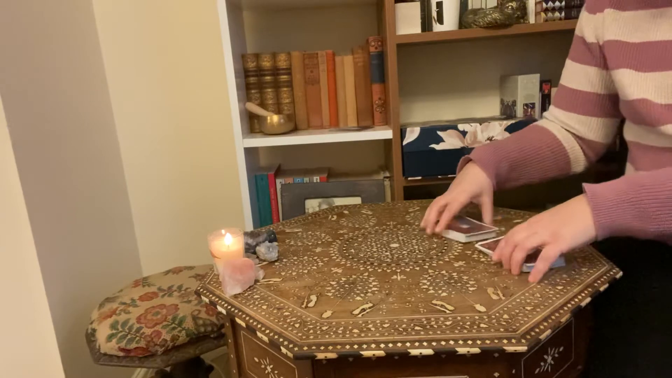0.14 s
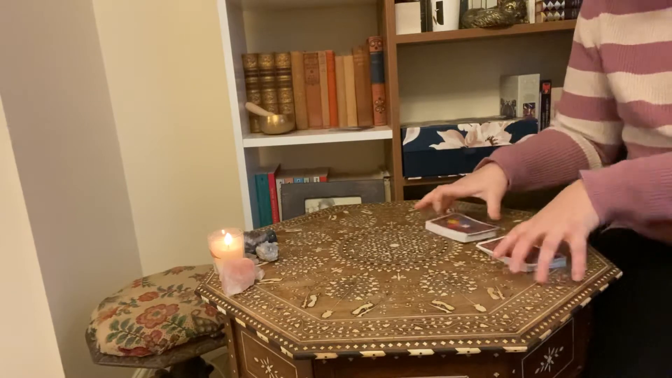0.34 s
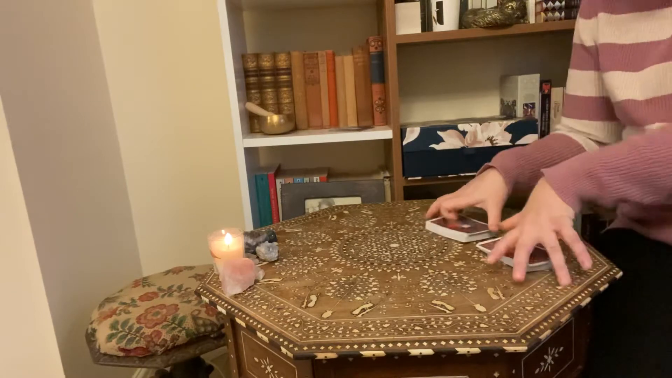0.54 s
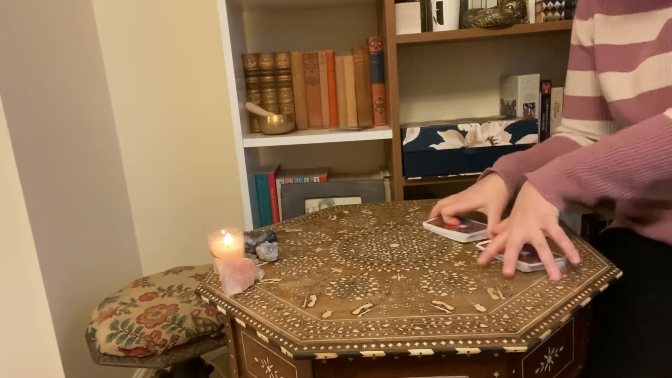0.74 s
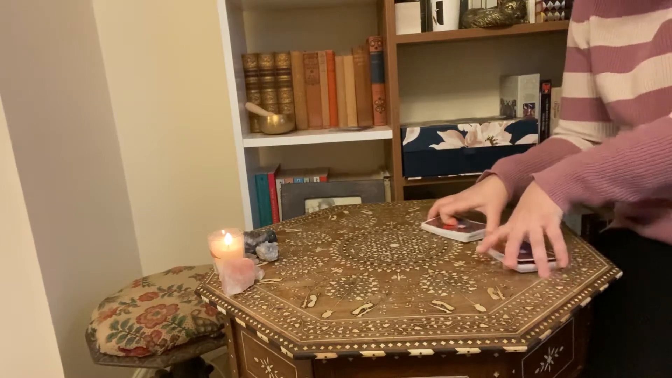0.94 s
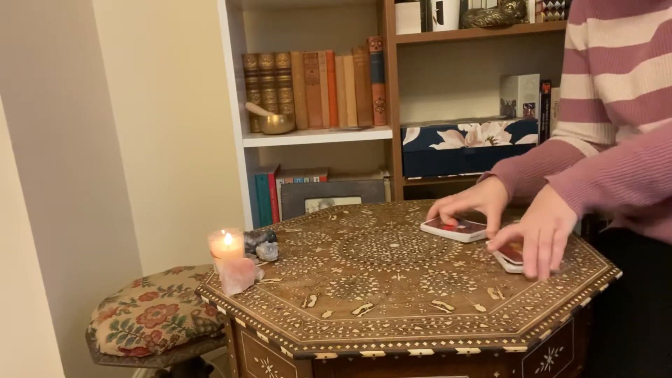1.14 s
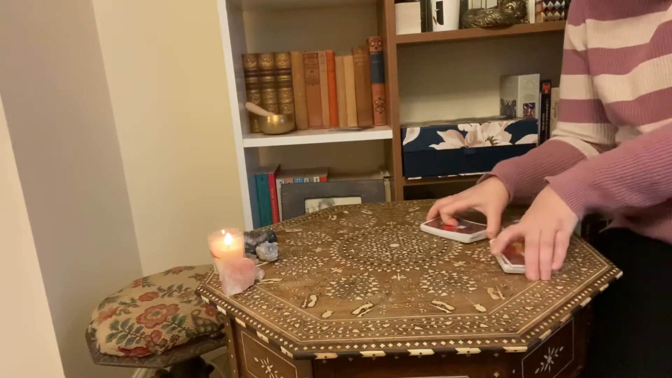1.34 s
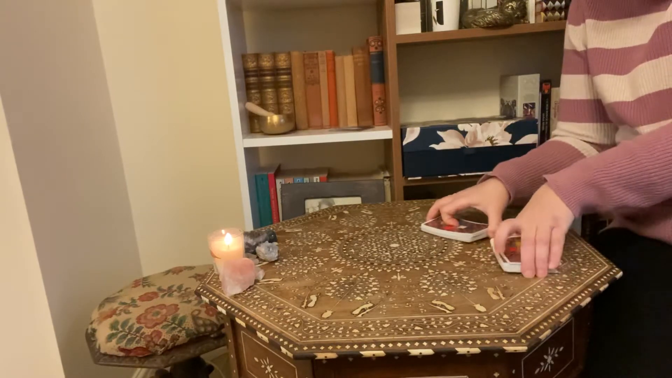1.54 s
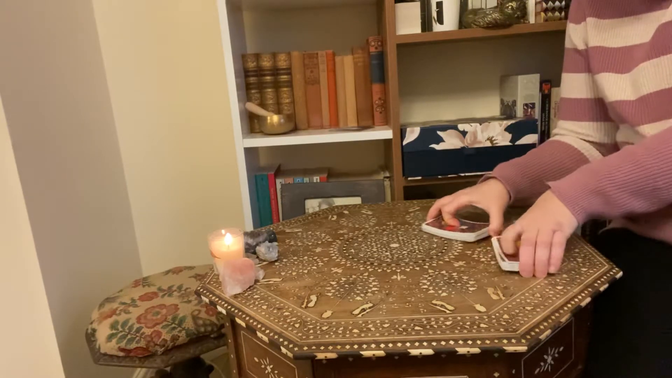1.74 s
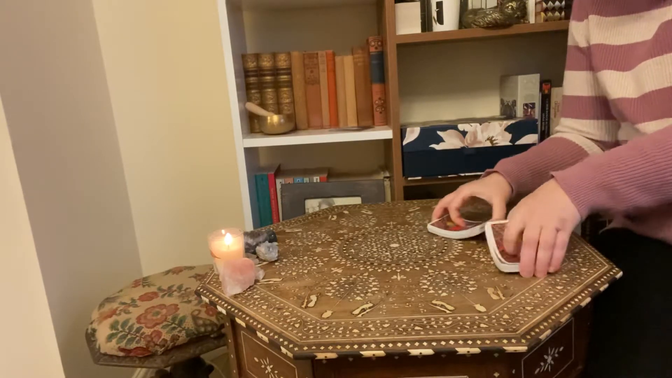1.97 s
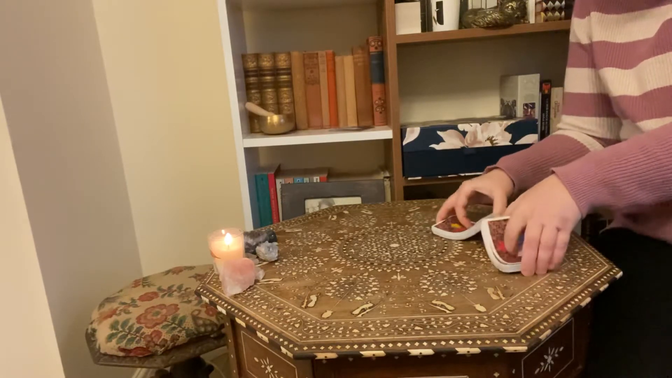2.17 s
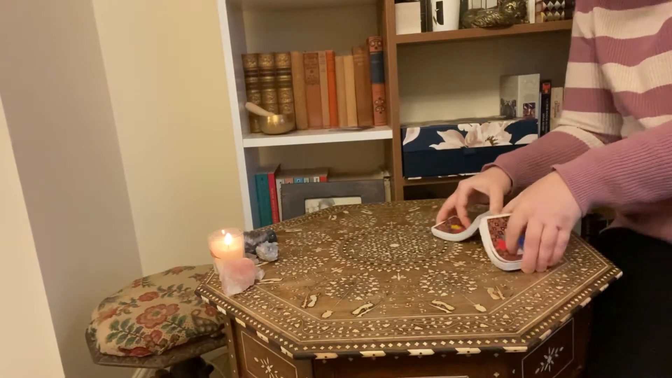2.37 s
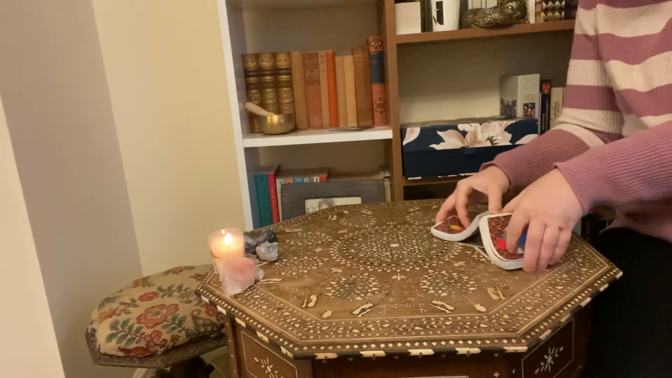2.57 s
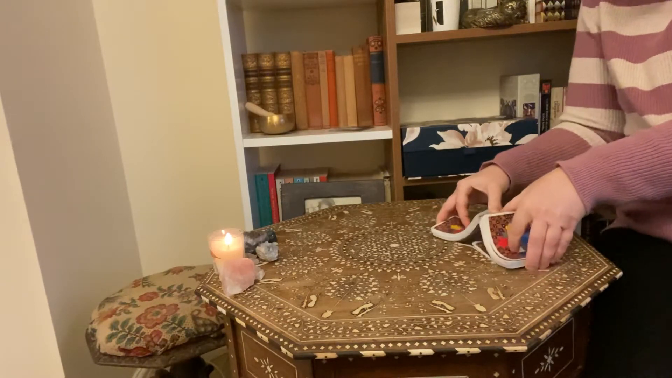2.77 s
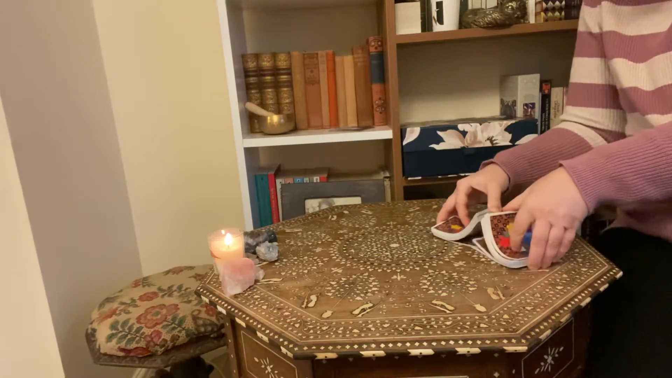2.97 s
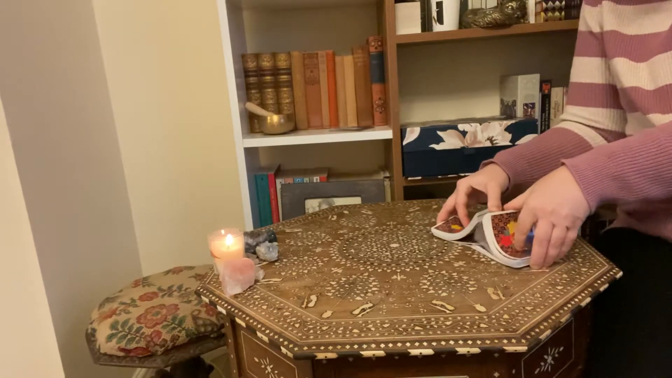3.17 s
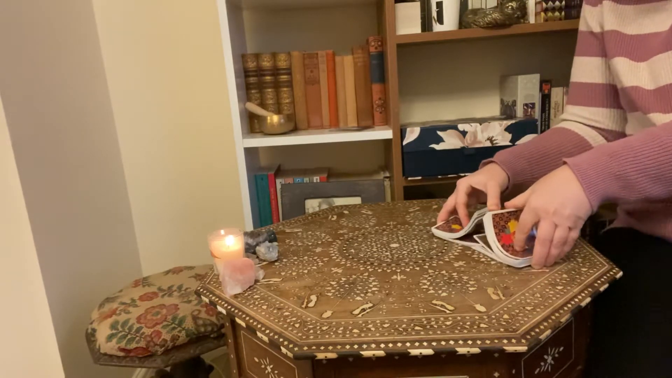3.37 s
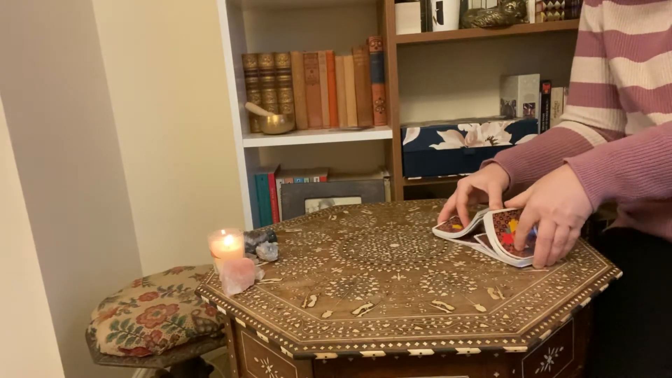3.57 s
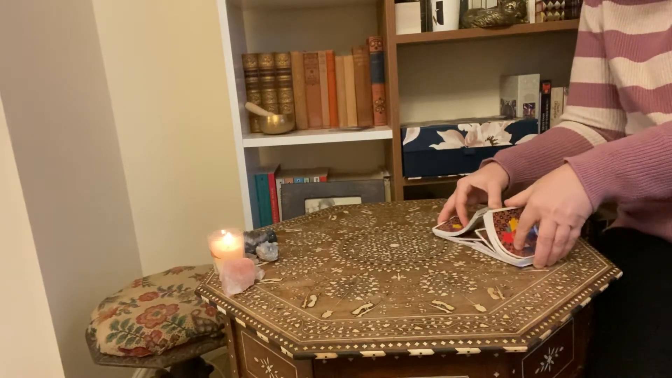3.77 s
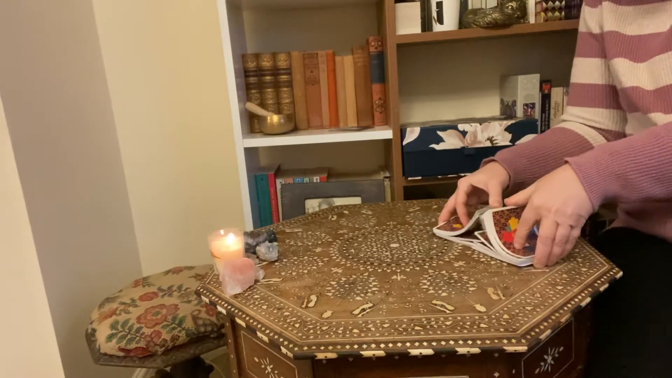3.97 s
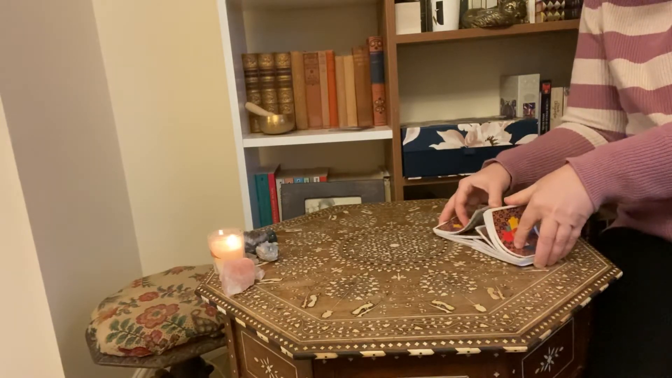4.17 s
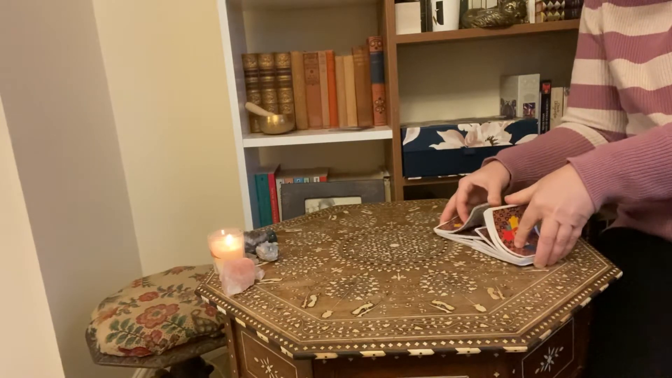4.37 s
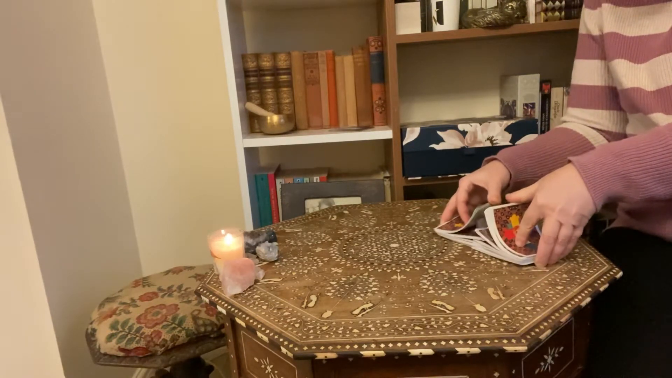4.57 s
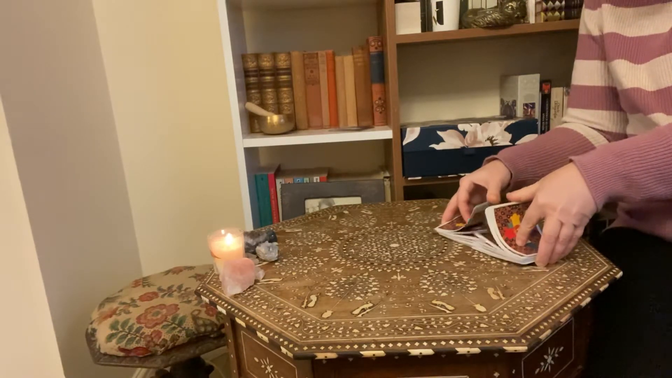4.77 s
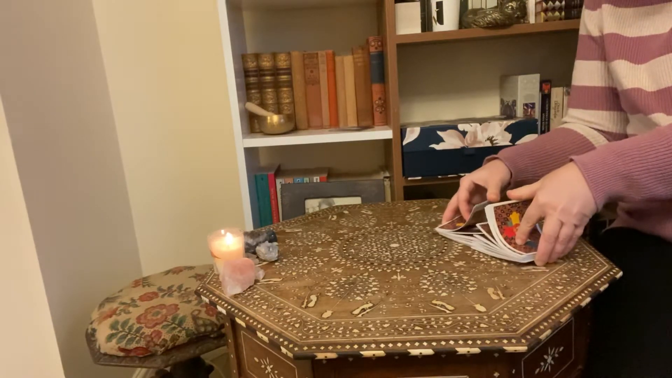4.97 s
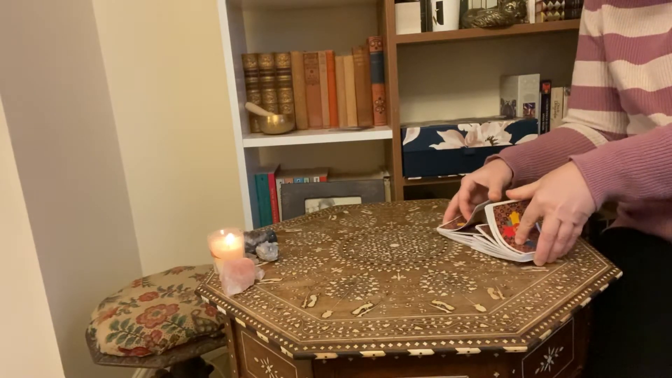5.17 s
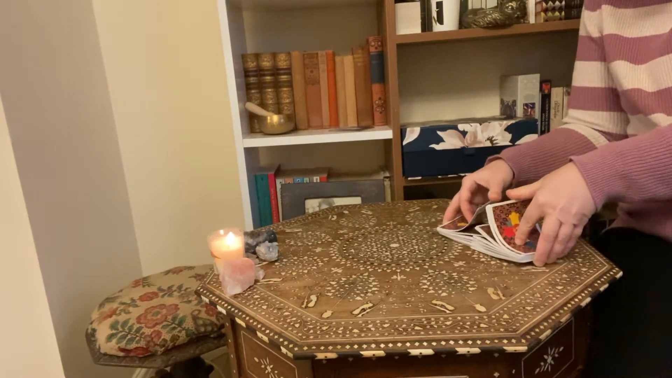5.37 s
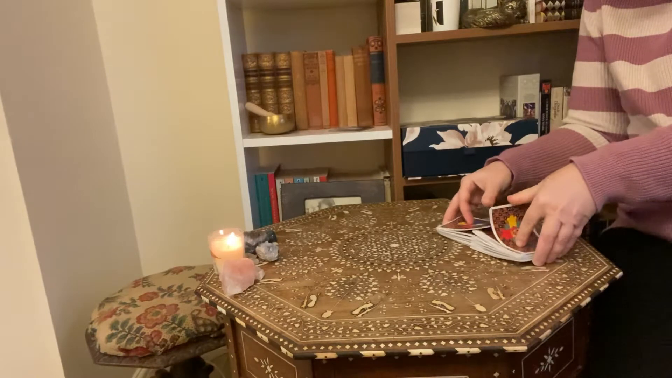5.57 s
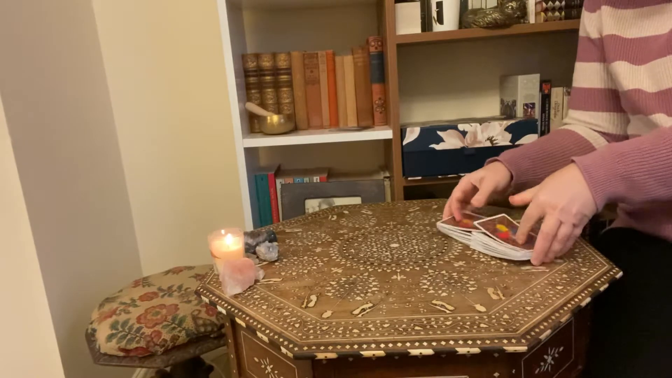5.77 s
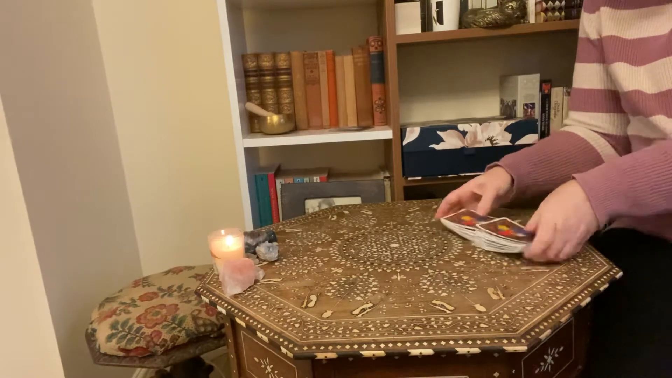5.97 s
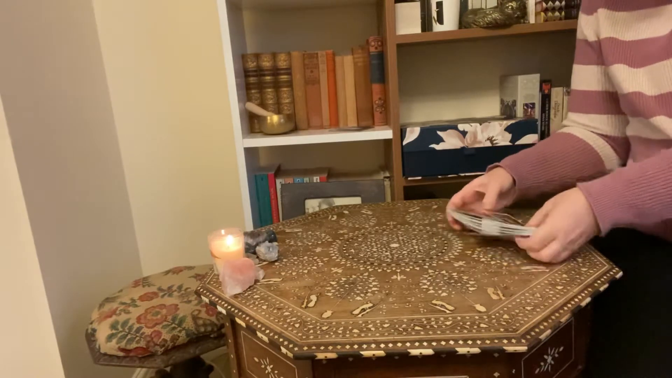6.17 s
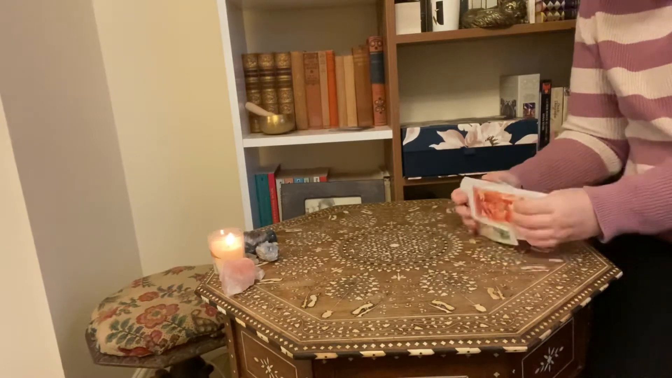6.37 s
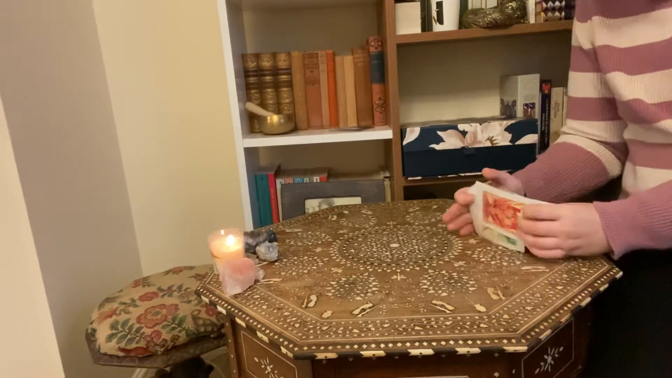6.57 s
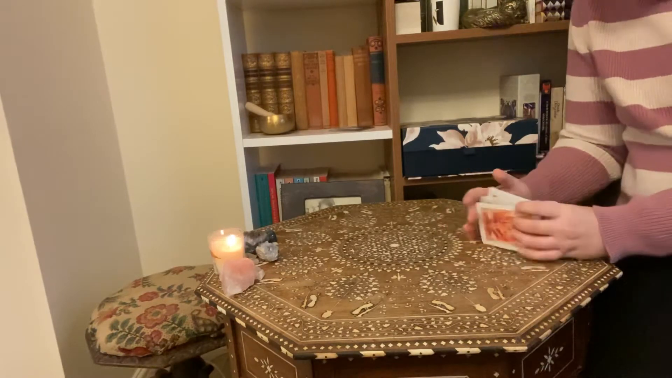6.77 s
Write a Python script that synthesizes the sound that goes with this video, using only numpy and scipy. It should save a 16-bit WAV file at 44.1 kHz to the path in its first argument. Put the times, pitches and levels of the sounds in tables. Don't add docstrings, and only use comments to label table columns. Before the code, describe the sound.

Close stereo pickup in a small room with a faint low hum. A soft thump sets the card packets on a hollow wooden table, then about two quiet seconds with barely audible touches. Cards riffle slowly and irregularly, snapping singly and in tight flurries, with one hard crack. The snaps thin out, then the deck slides with a light hiss and is squared with dull taps.

```python
import sys
import numpy as np
from scipy import signal
from scipy.fft import rfft, irfft
from scipy.io import wavfile

SR = 44100
rng = np.random.default_rng(int(sys.argv[2]) if len(sys.argv) > 2 else 0)


def persist_wave(psi):
    counts = np.round(np.clip(psi, -1, 1) * 32767).astype(np.int16)
    wavfile.write(sys.argv[1], SR, np.atleast_2d(counts).T)


def convert_level_to_amplitude(level_db):
    exponent = np.asarray(level_db, float) / 20
    return 10 ** exponent


N = 300762
TIME = np.arange(N) / SR


def rms_one(x):
    return x / np.sqrt(np.mean(x ** 2) + 1e-20)


def at_hz(points, hz):
    f, value = np.transpose(points)
    return np.interp(np.log(hz), np.log(f), value)


def drift(rate):
    step = 40
    r = np.exp(-2 * step * np.pi * rate / SR)
    slow = signal.lfilter([1], [1, -2 * r, r * r], rng.standard_normal(N // step + 2002))[2000:]
    return np.interp(np.arange(N) / step, np.arange(len(slow)), rms_one(slow))


def swell(middle, half, db):
    return convert_level_to_amplitude(db - 12 * np.minimum(((TIME - middle) / half) ** 2, 20))


def resonate(x, hz, width_hz):
    r = np.exp(-np.pi * width_hz / SR)
    zeros = np.array([1, 0, -1]) * (1 - r * r) / 2
    return signal.lfilter(zeros, [1, -2 * r * np.cos(2 * np.pi * hz / SR), r * r], x)


def body(x, modes):
    return sum((-1) ** k * convert_level_to_amplitude(db) * resonate(x, hz, width) for k, (hz, width, db) in enumerate(modes))


def bands(size, likeness):
    edges = 60 * 2 ** np.arange(0, 8.6, .5)
    white = rng.standard_normal((2, 2, size))
    for k, (low, high) in enumerate(zip(edges, edges[1:])):
        centre = np.sqrt(low * high)
        band = signal.butter(2, [low, high], "band", fs=SR, output="sos")
        mid, side = signal.sosfilt(band, white[k % 2])
        alike = np.clip(at_hz(likeness, centre), -1, 1)
        yield centre, np.sqrt(1 + alike) * mid + np.sqrt(1 - alike) * side * [[1], [-1]]


# t/s, peak level/dB, card resonance f/Hz, edge level/dB re peak, knock level/dB
SINGLES = [(2.396, -26.5, 1930, -2, -60), (2.61, -23.5, 3630, -6, -44.5), (2.712, -17, 1730, -10.5, -35.5),
           (2.88, -34, 1670, -12, -46), (2.941, -23.5, 3240, -11.5, -46.5), (3.229, -6.5, 2354, -12.5, -44),
           (3.92, -27, 1980, -6, -45.5), (4.27, -29.5, 1860, -9.5, -45), (4.507, -31, 1800, -13.5, -45),
           (4.688, -29.5, 3090, -5, -42.5), (4.735, -19.5, 1920, -7.5, -37),
           (4.925, -27.5, 1910, -9.5, -40), (5.125, -26.5, 1810, -15.5, -38.5),
           (5.319, -28.5, 1760, -5, -52.5), (5.618, -15, 1846, -9.5, -42.5)]
FOLLOWERS = [(2.759, -19, 2940, -9, -39), (2.995, -15, 3170, -21, -62), (3.049, -17, 3280, -14, -48),
             (3.107, -14.5, 1920, -11, -45.5), (3.435, -20.5, 3320, -11.5, -47),
             (3.474, -17, 3260, -11.5, -46), (3.618, -18.5, 3380, -10, -57),
             (3.671, -14, 2950, -8.5, -39.5), (3.751, -27, 1870, -12, -52), (3.757, -24, 1920, -6.5, -43),
             (3.813, -26, 1840, -8.5, -49), (3.945, -43.5, 1820, -14, -42.5), (4.088, -21, 1800, -8, -42),
             (4.094, -18.5, 1770, -5, -42.5)]
CRACKS = [
    (2.411, -15, 2960, -1, -44.5),
    (2.498, -17.5, 2010, -6.5, -42),
    (3.073, -14, 1280, -8, -29.5),
    (5.336, -28, 1820, -1.5, -55.5),
    (5.367, -22, 2860, -6, -46.5),
]
# t/s, peak level/dB, card resonance f/Hz, edge level/dB re peak
TOUCHES = [(0.119, -55, 1840, -35), (0.571, -48.5, 1650, -14.5), (0.789, -63, 1690, -8),
           (0.959, -63.5, 3080, -10), (1.091, -59, 3300, -10), (1.684, -47, 1850, -15),
           (2.463, -24, 3000, -5.5), (2.662, -23.5, 1550, -12), (3.113, -29, 1820, -4),
           (3.24, -10.5, 2460, -35.5), (3.633, -15.5, 1910, -17.5), (3.65, -17.5, 1320, -15),
           (3.962, -16.5, 3140, -15.5), (4.038, -22.5, 1620, -10.5), (4.285, -26.5, 1835, -8.5),
           (4.528, -36.5, 1860, -10.5), (4.678, -41, 2630, -1), (4.741, -21, 2030, -23),
           (5.11, -39, 1990, -6.5), (5.601, -31.5, 1900, -12.5), (5.612, -16, 1113, -20),
           (6.174, -46, 1400, 2), (6.186, -44.5, 3100, 3.5), (6.218, -44.5, 3350, 6)]
SQUARING = [(6.417, -45, 2320, -23), (6.545, -25.5, 1700, -21.5), (6.552, -15.5, 3050, -48),
            (6.558, -14, 1980, -44), (6.566, -13, 1730, -16), (6.572, -18.5, 1080, -40),
            (6.579, -19, 1735, -29), (6.672, -11.5, 3150, -43), (6.674, -15.5, 970, -51),
            (6.735, -19, 1780, -24), (6.806, -30.5, 2800, -50)]
DRAGS = [
    (0.011, -33, 1740, -14.5),
    (5.967, -39, 2330, -10.5),
    (6.338, -44, 1000, -28.5),
    (6.438, -25, 1320, -27.5),
    (6.458, -38.5, 1190, -38),
    (6.479, -30, 1100, -30.5),
    (6.51, -33.5, 1680, -23.5),
]


def contacts():
    ticks = [(s - .014, peak_db - 16.5, hz, -11) for s, peak_db, hz, *_ in SINGLES]
    kinds = [(SINGLES, (-12, 4.8)), (FOLLOWERS, (-13, 6.1)), (TOUCHES, (-8.5, 6.6)), (SQUARING, (-4.5, 4)),
             (ticks, (-12, 24)), (CRACKS, (-14.5, 12)), (DRAGS, (-12, 24))]
    return [(*row[:4], *flutter) for rows, flutter in kinds for row in rows]


# f/Hz, width/Hz, level/dB
CARD_BODY = [(580, 790, -6), (960, 560, -0.5), (2047, 260, -13), (3010, 1425, 0.5), (4100, 5700, -8)]
# f/Hz, width/Hz, level/dB
EDGE = [(6400, 10000, 4), (12040, 3000, -4)]


def snaps():
    lead, size = 600, 5000
    t = (np.arange(size) - lead) / SR
    slip = convert_level_to_amplitude(-17.5) * np.exp(np.minimum(t, 0) / 0.0071) * (t < 0)
    dull = signal.butter(2, 4800, fs=SR, output="sos")
    out = np.zeros(N + size)
    for s, peak_db, hz, edge_db, flutter_db, flutter_ms in contacts():
        slaps = rms_one(rng.standard_normal(size) * convert_level_to_amplitude(1.8 * rng.exponential(1, size)))
        flutter = np.exp(-1000 * np.abs(t) / max(flutter_ms, .3)) * (t > 0)
        push = convert_level_to_amplitude(flutter_db) * slaps * (slip + flutter)
        push[lead] = 1
        card = body(push, CARD_BODY) + convert_level_to_amplitude(6) * resonate(push, hz, .3 * hz)
        card = signal.sosfilt(dull, card)
        push[lead] = 3
        edge = body(push, EDGE)
        sound = card / np.linalg.norm(card) + convert_level_to_amplitude(edge_db + 6.0) * edge / np.linalg.norm(edge)
        at = round(s * SR)
        out[at:at + size] += convert_level_to_amplitude(peak_db + 14) * sound[:N + size - at]
    return out[lead:N + lead]


# f/Hz, level/dB, t60/s
TABLE = [(88.5, -8.5, 0.39), (122, -3.5, .12), (143.8, 0.5, 0.28), (151, 0.5, 0.13), (217.5, -7.5, 0.21),
         (285, -5.5, 0.058), (305, -5.5, 0.11), (340, 4, 0.036), (451.7, 2.5, 0.035), (573, -9, 0.11),
         (730, -8.5, 0.04), (802, 2, 0.039)]
# t/s, peak level/dB, then levels/dB re peak of the legs' deep mode,
# the hollow's mode and the upper modes
THUMPS = [(0.0, -36, -23, -22, -15), (0.012, -32.5, -14, -3.5, -17), (0.024, -30, -19, -10.5, -10.5),
          (0.16, -55.5, -4, 5, -14), (0.574, -58.5, -7, 1.5, -13), (3.23, -19.5, -24, -11, 1),
          (3.24, -48, -10, -13, -9), (3.634, -40, 8, -27, 10.5), (3.646, -28.5, -5, -9.5, -30),
          (4.045, -34, 4, -4.5, 2), (4.689, -39.5, -2.5, -30, -16), (5.334, -38, -3, 1, 1),
          (5.367, -50, -10, 4, 4), (5.964, -41, -5, -11, -4.5), (6.337, -52, -17, -10, -1),
          (6.437, -56.5, 13, -2.5, 9.5), (6.486, -46, 3, -8, 7), (6.559, -42.5, 9, -10, 12),
          (6.584, -41, -5, 4, 6.5), (6.609, -41.5, -19, 1, -4), (6.675, -40.5, -18, -19, -4),
          (6.744, -48.5, -24, -15, 6)]


def table():
    # -8, -10.5, 3 dB
    knocks = [(row[0], row[-1], -8, -10.5, 3) for row in SINGLES + FOLLOWERS + CRACKS]
    s, peak_db, deep_db, hollow_db, upper_db = np.transpose(THUMPS + knocks)
    spread_db = rng.normal(0, 2, (len(s), len(TABLE)))
    out = 0
    for k, (hz, level_db, t60) in enumerate(TABLE):
        if hz < 138:
            share_db = deep_db
        elif hz < 180:
            share_db = hollow_db
        else:
            share_db = upper_db if hz > 328 else 0
        blows = np.full(N, 1e-18)
        at = np.round((s + 1.2 / hz) * SR).astype(int)
        blows[at] = convert_level_to_amplitude(peak_db + share_db + level_db - 2.5 + spread_db[:, k])
        r = convert_level_to_amplitude(-60 / (t60 * SR))
        w = 2 * np.pi * hz / SR
        out = out + signal.lfilter([0, np.sin(w)], [1, -2 * r * np.cos(w), r * r], blows)
    soft = np.hanning(40)
    return np.convolve(out, soft / soft.sum())[:N]


# middle t/s, half length t/s, edge hiss level/dB, body rub level/dB re hiss
SLIDES = [(0.014, 0.032, -79, 21), (2.128, 0.08, -80, 17), (5.344, 0.03, -45.5, 15),
          (5.897, 0.065, -59.5, 8), (5.976, 0.042, -48.5, 1.5), (6.09, 0.071, -70, 10.5),
          (6.168, 0.0315, -58.5, 2.5), (6.223, 0.024, -45.5, 3), (6.283, .04, -43.5, -2),
          (6.368, 0.033, -65.5, 4), (6.416, 0.028, -54.5, 5), (6.485, 0.057, -77.5, 10),
          (6.529, 0.03, -71, 15.5), (6.599, 0.016, -51.5, 14), (6.663, .02, -54.5, 16.5),
          (6.71, 0.037, -48, 17.5), (6.764, 0.015, -67.5, 21)]


def slides():
    catching_db = 2.2 * rng.exponential(1, N) + 2.5 * drift(40)
    grains = rng.standard_normal(N) * convert_level_to_amplitude(catching_db)
    grains = signal.sosfilt(signal.butter(2, 1100, "high", fs=SR, output="sos"), grains)
    rub = rms_one(resonate(grains[::-1], 1800, 2600))
    hiss = rms_one(body(grains, EDGE))
    out = 0
    for middle, half, hiss_db, rub_db in SLIDES:
        out = out + swell(middle, half, hiss_db - 9.5) * (hiss + convert_level_to_amplitude(rub_db) * rub)
    return out


# f/Hz, t60/s
ROOM_T60 = [(100, 0.33), (260, 0.22), (700, 0.3), (1840, 0.3), (4850, 0.26), (12800, 0.16)]
# f/Hz, level/dB re direct
ROOM_COLOUR = [(150, -12.5), (600, -18), (2000, -25.5), (5000, -21.5), (12000, -23.5), (18000, -35)]
# f/Hz, coherence/1
ROOM_LIKENESS = [(100, 0.98), (300, 0.79), (600, 0.1), (3000, 0.22), (5500, 0.7), (7500, 0.62),
                 (10200, 0.82), (14000, 0.46)]


def room(x):
    t = np.arange(SR // 2) / SR
    tail = 0
    for hz, noise in bands(len(t), ROOM_LIKENESS):
        tail = tail + convert_level_to_amplitude(at_hz(ROOM_COLOUR, hz) - 60 * t / at_hz(ROOM_T60, hz)) * noise
    response = convert_level_to_amplitude(-14.5) * tail * (1 - np.exp(-t / 0.0011))
    return signal.fftconvolve(x[None], response, axes=1)[:, :N]


# t/s, level/dB
GAIN_RIDE = [(0.0, -59.5), (0.26, -61), (0.3, -61), (0.7, -59.5), (2.05, -59), (2.24, -63), (2.45, -55.5),
             (3.27, -59.5), (3.55, -60.5), (4.12, -55), (4.5, -62.5), (4.8, -58), (5.28, -61),
             (5.43, -56.5), (5.75, -64.5), (6.5, -59), (6.82, -59.5)]
# middle t/s, half length t/s, level/dB
WHINE = [
    (0.565, 0.088, -76),
    (0.897, 0.22, -79.5),
    (1.384, 0.26, -75),
]
# f/Hz, level/dB per Hz
AIR = [(38, -29), (65, 1), (71, -8.5), (136, -10), (247, -23.5), (311, -14.5), (366, -33.5), (730, -27),
       (1060, -40.5), (2060, -34.5), (2650, -55), (3120, -42), (4830, -49), (8200, -48), (16000, -60.5)]
# f/Hz, coherence/1
AIR_LIKENESS = [(60, 0.52), (240, 0.63), (950, 0.065), (4000, .2), (8000, 0.55)]


def room_noise():
    drone_db = np.interp(TIME, *np.transpose(GAIN_RIDE))
    air_db = -62.5 + 2.3 * (drone_db - drone_db.mean())
    turn = np.cumsum(2 * np.pi * (47 + 2.0 * drift(2.5)) / SR)
    drone = np.sqrt(2) * convert_level_to_amplitude(drone_db + 0.52 * drift(4)) * np.sin(turn + np.array([[0], [.3]]))
    drone = drone * convert_level_to_amplitude([[-.4], [.4]])
    whine_hz, width_hz = 731, 33
    whine = resonate(rng.standard_normal((2, N)), whine_hz, width_hz)
    whine = rms_one(resonate(whine, whine_hz, width_hz))
    air = sum(convert_level_to_amplitude(at_hz(AIR, hz) + 1.5 * drift(5)) * noise for hz, noise in bands(N, AIR_LIKENESS))
    return drone + sum(swell(*row) for row in WHINE) * whine + convert_level_to_amplitude(air_db) * rms_one(air)


# f/Hz, left lead/rad
CHANNEL_PHASE = [(0, 0), (1500, -.6), (3000, -.9), (5200, -2), (6800, 0), (7700, 0), (9500, -3.14),
                 (11000, -3.14), (12000, -6.28), (14200, -6.28), (15000, -9.42)]


def scene():
    deck = snaps() + table() + slides()
    deck = signal.sosfilt(signal.butter(4, 65, "high", fs=SR, output="sos"), deck)
    spot = 1.6 * drift(2.5)
    pan_db = 1.08 + .6 * np.sin(spot)
    direct = deck * convert_level_to_amplitude(pan_db * np.array([[1], [-1]]))
    left, right = direct + room(deck * np.cos(spot)) + room(deck * np.sin(spot)) + room_noise()
    hz = np.arange(N // 2 + 1) * SR / N
    lead = np.exp(1j * np.interp(hz, *np.transpose(CHANNEL_PHASE)))
    return np.array([irfft(rfft(left) * lead, N), right])


def band_limit(x):
    return signal.sosfilt(signal.butter(12, 16650, fs=SR, output="sos"), x)


def record(dry):
    mix = signal.sosfilt(signal.cheby2(10, 60, 18000, fs=SR, output="sos"), dry)
    return band_limit(mix)


dry = scene()
out = record(dry)
persist_wave(out)
```